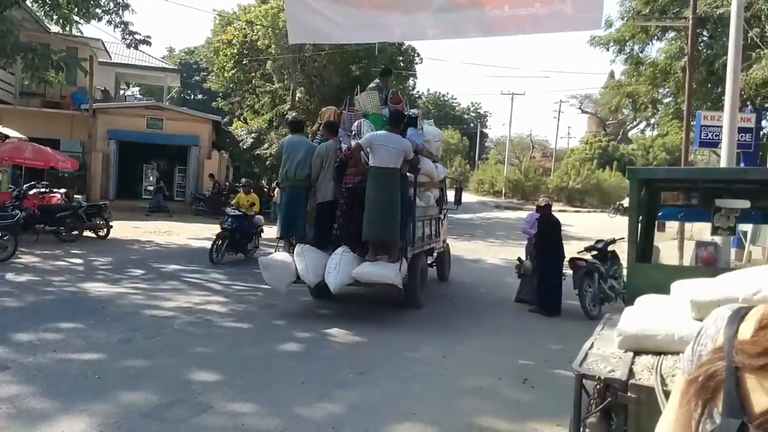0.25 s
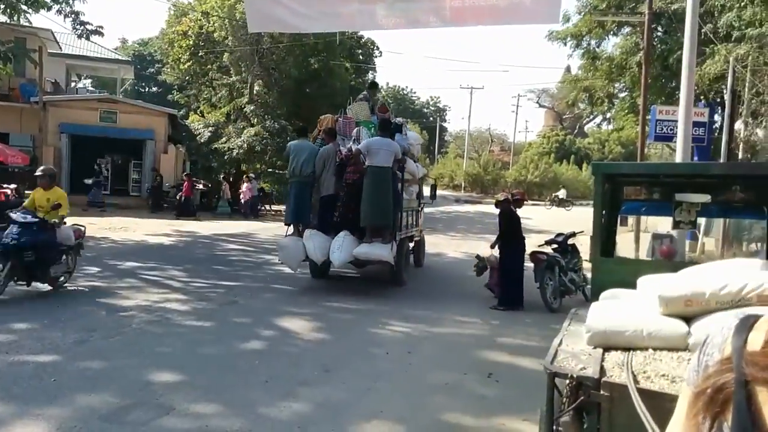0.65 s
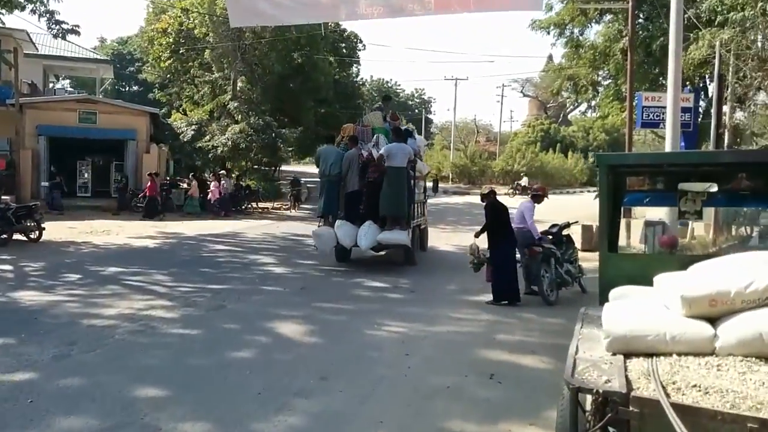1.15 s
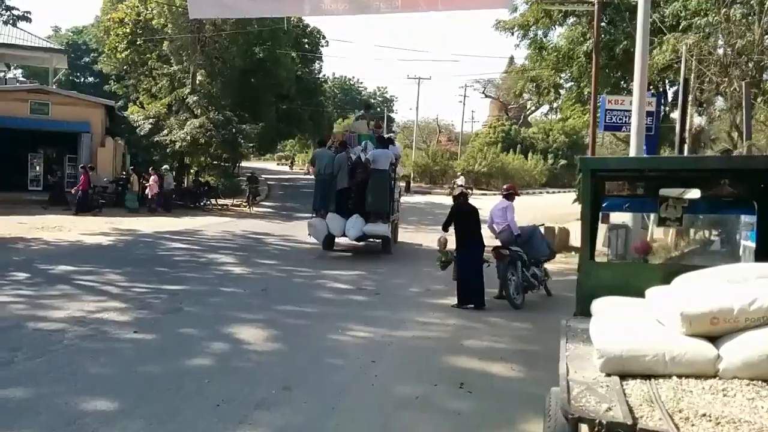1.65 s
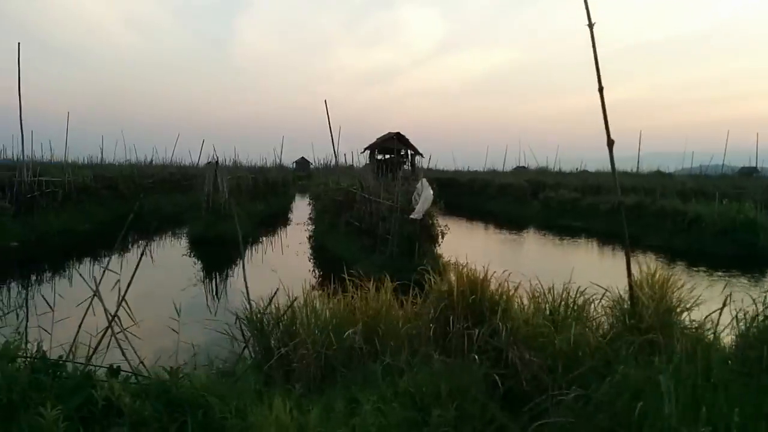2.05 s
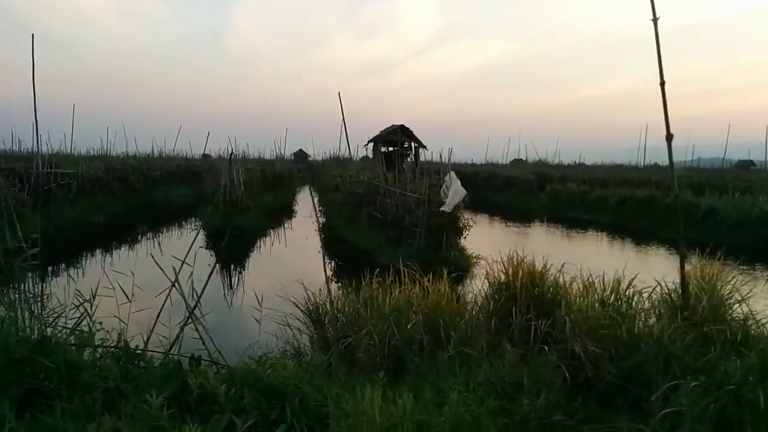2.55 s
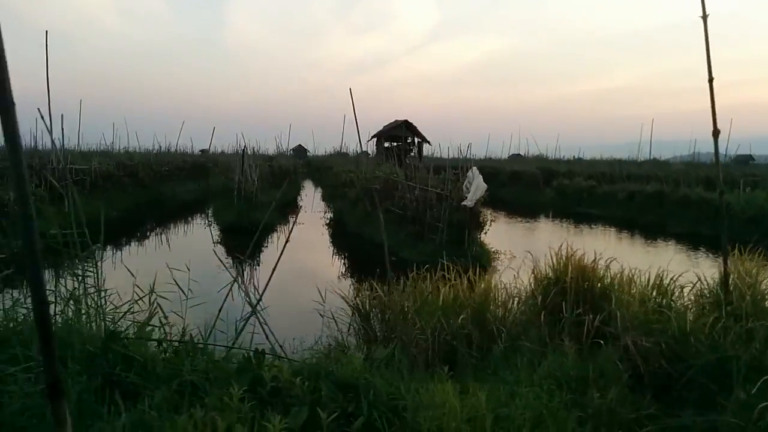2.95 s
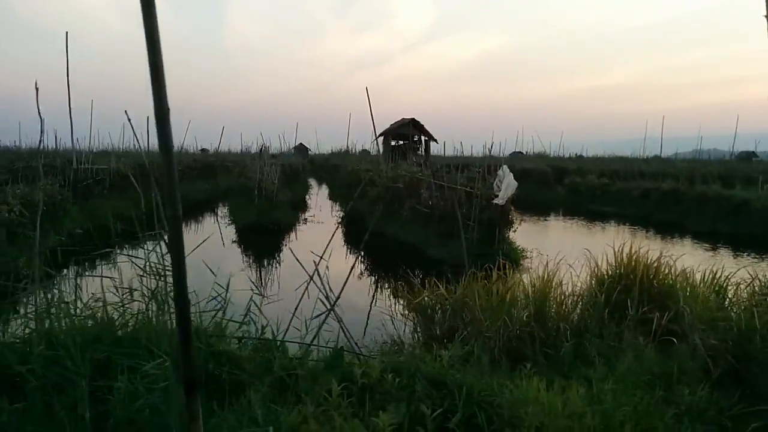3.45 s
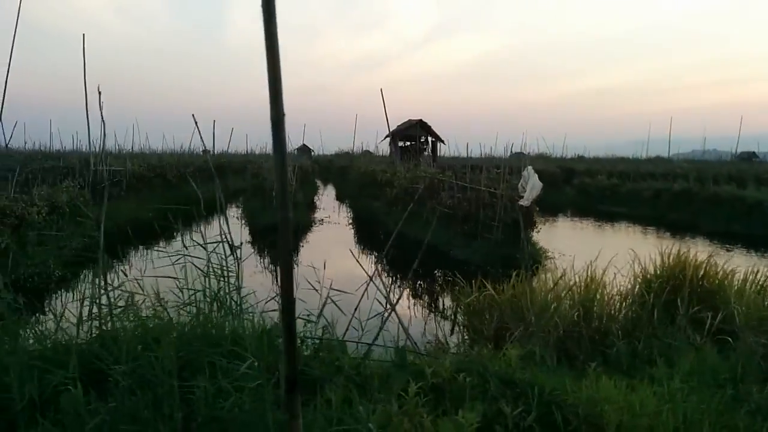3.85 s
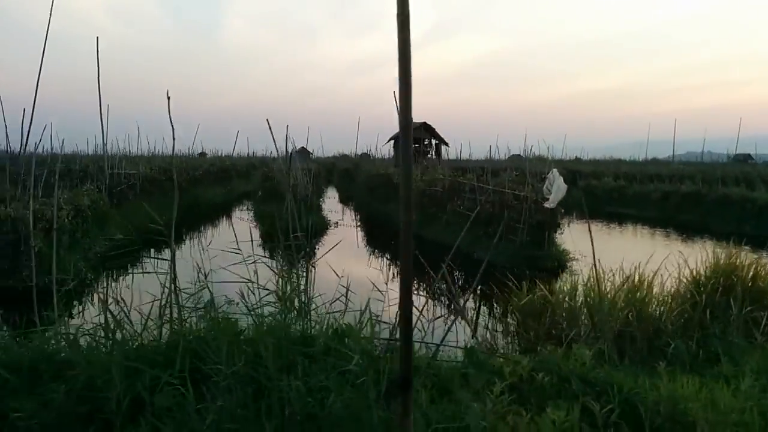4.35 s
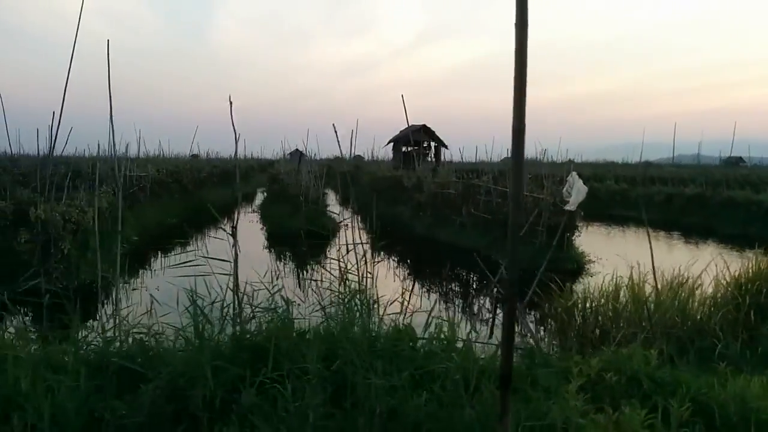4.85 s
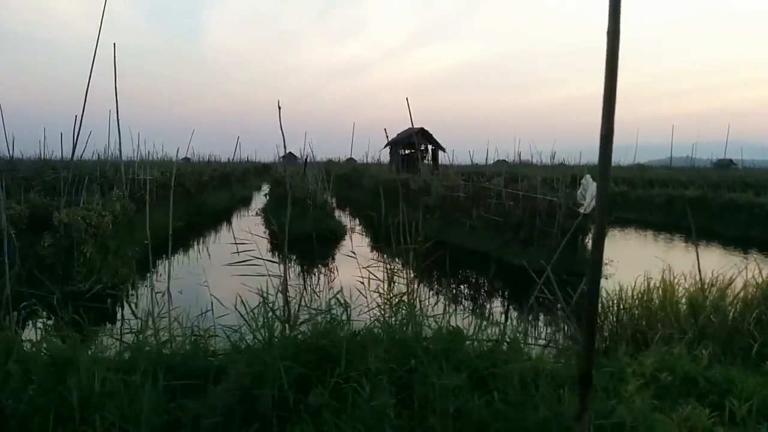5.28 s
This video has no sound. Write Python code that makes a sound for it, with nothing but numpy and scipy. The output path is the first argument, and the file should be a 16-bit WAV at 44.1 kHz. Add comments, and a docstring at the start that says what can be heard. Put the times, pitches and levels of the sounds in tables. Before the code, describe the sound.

A loud single-cylinder diesel farm truck thuds and cracks away close by, then abruptly a quiet boat engine putters over lapping marsh water.

```python
"""A farm truck with a single-cylinder diesel pulls away. Each firing is a low thump, a sharp crack, a bark and
a rasp from the exhaust pipe, over drone, clatter and hiss; a loose steel part clinks early on.
The throttle closes, leaving rumble, a panel that bangs and rubs, and jolts of the load bed.
Abruptly the scene changes to a marsh: a slow boat engine putters (gulp, chuff, squeaks, clack, boom) over
lapping water, joined by a faint cricket and then a far bird. Shaped noise and decaying tones make it all."""
import sys
import numpy as np
from scipy import signal
from scipy.fft import rfft, irfft, next_fast_len
from scipy.io import wavfile
from scipy.ndimage import uniform_filter1d, minimum_filter1d, map_coordinates

SR = 44100
rng = np.random.default_rng(int(sys.argv[2]) if len(sys.argv) > 2 else 0)


def output_pcm(signal):
    """Save a mono or channel-first signal as 16-bit PCM at the path in sys.argv[1].

    Samples are clipped to [-1, 1] before scaling.
    """
    pcm = np.clip(np.atleast_2d(signal).T, -1, 1) * 32767
    wavfile.write(sys.argv[1], SR, np.round(pcm).astype(np.int16))


N = 243431  # length in samples


# beats of the diesel, base levels: crack_s, thump_db, bark_db, rasp_db, crack_db
DIESEL_BEATS = [(0.0542, -23, -17.5, -21, -24), (0.1395, -21, -38, -26.5, -30.5),
                (0.2259, -20.5, -20.5, -29, -24.5), (0.3116, -20.5, -28, -36, -30),
                (0.3974, -19.5, -23.5, -22.5, -20), (0.4836, -22.5, -16.5, -13, -20.5),
                (0.5702, -21, -18, -24, -14), (0.6579, -24, -24, -22.5, -19.5),
                (0.7442, -25, -23, -18, -20), (0.83, -23, -24, -17, -24), (0.918, -21.5, -20.5, -27, -29),
                (1.0058, -24, -18.5, -22.5, -26.5), (1.0936, -23.5, -24, -22, -37),
                (1.1829, -21, -27.5, -36, -55), (1.2687, -22.5, -30.5, -43, -65),
                (1.3519, -30.5, -29, -44, -70), (1.447, -27.5, -40, -37, -81),
                (1.537, -28, -46, -45.5, -81), (1.627, -34, -34.5, -46, -79)]


def truck():
    """Exhaust beats over the noises of the open engine and the shaking body."""
    times, thump_db, bark_db, rasp_db, crack_db = np.transpose(DIESEL_BEATS)
    pipe = exhaust(times, bark_db, rasp_db, crack_db) + steel(times, crack_db)
    beats = thumps(times, thump_db) + pipe + amp(-12.5) * street_echo(pipe)
    return beats + running_noise(times) + panel() + clink() + load_bed()


def thumps(times, thump_db, lead=.0105, first_lead=0.019, settle_s=0.34, rise=0.0049, hold=0.038,
           release=0.0064, pipe_hz=72, overtone_hz=140, overtone_db=-10.0, gain_db=4.0):
    """Each slug of gas swings the air in the silencer; it leads the crack by less as the truck gets going."""
    out, t = np.zeros(N), np.arange(SR // 8) / SR
    for s, db in zip(times, thump_db):
        pitch, colour, length, phase = rng.standard_normal(4)
        fade = 1 + np.exp((t - hold * np.exp(0.052 * length)) / release)
        shape = (1 - np.exp(-t / rise)) / fade
        main = -np.sin(2 * np.pi * pipe_hz * (1 + .06 * pitch) * t)
        overtone = amp(overtone_db + 2.2 * colour) * np.sin(2 * np.pi * overtone_hz * t + phase)
        start = s - lead - first_lead * np.exp(-s / settle_s)
        add(out, start, amp(db + gain_db) * shape * (main + overtone))
    gusts = bursts(times - lead, thump_db - 6.0, rise=0.0013, decay=0.017)
    turbulence = noise([(60, -3.5), (110, 5), (200, -4.5), (450, -6.5)]) * gusts
    return out + turbulence


# low and high resonances of the exhaust pipe: pitch_hz, width_hz, level_db
LOW_PIPE = [(507, 85, -8.5), (631, 59, -1.5), (728, 77, -2.5), (833, 83, -4), (930, 51, -2.5)]
HIGH_PIPE = [(970, 51, 5), (1238, 56, 7), (1460, 86, -5.5), (1827, 65, -1), (2240, 200, -4),
             (2852, 110, -3.5)]
# tone colour of the shock bouncing in the pipe: pitch_hz, level_db
SHOCK_COLOUR = [(500, -10.5), (850, 4.5), (1300, -1), (2200, -4.5), (3000, -30.5), (4000, -19)]
# tone colour of the sharp crack: pitch_hz, level_db
CRACK_COLOUR = [(2500, -29.5), (4000, -11.5), (5100, 9), (6400, -6), (8200, 8), (10500, -5), (13000, -11),
                (16000, -21)]


def exhaust(s, bark_db, rasp_db, crack_db, bounce=0.0036, returned=0.49):
    """Gas leaks as the valve lifts, then a shock leaves the pipe and bounces inside it."""
    leak = bursts(s - .015, bark_db - 5.0, rise=0.00068, decay=0.011)
    blast = bursts(s + 0.0013, bark_db + 3.5, rise=0.00026, decay=0.0035)
    bark = resonate(rng.standard_normal(N) * (leak + blast), LOW_PIPE)
    # every bounce comes later and weaker
    shocks = sum(returned ** k * bursts(s + 0.0026 + k * bounce, rasp_db + 3.0, rise=0.0001, decay=0.0023)
                 for k in range(4))
    rush = bursts(s + 0.0015, rasp_db + 0.5, rise=0.00019, decay=0.0082)
    rasp = resonate(rng.standard_normal(N) * rush, HIGH_PIPE) + shocks * noise(SHOCK_COLOUR)
    snap = bursts(s, crack_db - 0.5, rise=0.0018, decay=0.0023)
    crack = amp(5.1 * wobble(900)) * noise(CRACK_COLOUR, patchy_db=5.5) * snap
    fizz = bursts(s, crack_db - 19.5, rise=0.0018, decay=0.015)
    sizzle = amp(4.5 * wobble(400)) * noise(CRACK_COLOUR, patchy_db=4.5) * fizz
    return bark + rasp + crack + sizzle


# ringing notes of the engine's steel: pitch_hz, level_db, time_to_fall_60_db_s
STEEL_NOTES = [(3940, -14, 0.069), (5444, -1.5, 0.03), (7630, -4, 0.0097), (8140, 1, 0.014),
               (9050, -6.5, 0.0083), (9630, -4.5, 0.016), (11500, -15, 0.012)]


def steel(times, crack_db, count=4, gap=0.0097, loss_db=9.0, scatter_db=5.0, detune=0.014, gain_db=-4):
    """Every crack shakes loose steel: a few uneven contacts, each with its own mix of ringing notes."""
    out, t = np.zeros(N), np.arange(SR // 12) / SR
    hz, level, t60 = np.transpose(STEEL_NOTES)[:, :, None]
    for s, db in zip(times, crack_db):
        for k in range(count):
            size, pitch, phase = rng.standard_normal((3, len(STEEL_NOTES), 1))
            fade = amp(level + scatter_db * size - 60 * t / t60)
            notes = fade * np.sin(2 * np.pi * (hz * (1 + detune * pitch) * t + phase))
            onset = 1 - np.exp(-t / 0.00074)
            add(out, s, amp(db + gain_db - loss_db * k) * notes.sum(0) * onset)
            s = s + gap * (.5 + rng.random())
    return out


def street_echo(x, t60=0.12, gap=0.013):
    """House fronts and the road answer each beat with a short, fading tail."""
    t = np.arange(SR // 3) / SR
    tail = rng.standard_normal(len(t)) * amp(-60 * t / t60) * np.clip(t / gap - 1, 0, 1)
    return signal.fftconvolve(x, tail / np.linalg.norm(tail))[:N]


# base levels of the running truck: time_s, drone_db, clatter_db, hiss_db, loose_bodywork_db
TRUCK_LEVELS = [(0, -36, -28, -36, -30.5), (.32, -40, -34.5, -41, -33), (.7, -30.5, -32, -43.5, -36.5),
                (1.08, -35, -40, -44, -35), (1.2, -34.5, -35.5, -50.5, -36), (1.3, -31, -37, -64.5, -37),
                (1.55, -31, -46, -76, -37), (1.62, -31, -45.5, -65.5, -37), (1.82, -33.5, -39.5, -60, -46)]
# tone colours of the drone, the clatter and the loose bodywork: pitch_hz, level_db
DRONE_COLOUR = [(50, -19.5), (90, -6), (165, 0), (270, -5), (370, -6), (500, -12), (900, -35.5)]
CLATTER_COLOUR = [(250, -37), (450, -3), (620, 5), (950, -4), (1400, -11), (2000, -34), (3500, -39),
                  (6000, -30.5)]
BODYWORK_COLOUR = [(1000, -16.5), (1700, 0.5), (2300, -1.5), (2850, 0.5), (3300, -9), (3900, -9.5),
                   (4600, -34), (6000, -36.5)]
# tone colours of the hiss, near and then far: pitch_hz, level_db
NEAR_HISS = [(2500, -30), (4200, -5), (5800, -2), (7200, 5.5), (8400, 4), (10000, -4.5), (12500, -11.5),
             (15000, -22), (16500, -35.5)]
FAR_HISS = [(2500, -12), (4200, -1.5), (7200, 6), (8400, 1.5), (10000, -13), (16000, -29)]
AWAY_S, DULLING_S = 1.1, .3  # from here the truck draws away, and over this time its hiss dulls


def running_noise(times):
    """Coloured noises of the open engine and body; clatter and rattle dip just before each firing."""
    drone_db, clatter_db, hiss_db, rattle_db = curves(TRUCK_LEVELS)
    drone = amp(drone_db + 2 + wobble(39.58)) * noise(DRONE_COLOUR, patchy_db=4)
    clatter = amp(clatter_db + 1.0 + 3.14 * wobble(70)) * noise(CLATTER_COLOUR, patchy_db=2.5)
    rattle = amp(rattle_db - 3.5 + 1.92 * wobble(90)) * noise(BODYWORK_COLOUR, patchy_db=4.5)
    far = np.clip((clock() - AWAY_S) / DULLING_S, 0, 1) * np.pi / 2
    colour = np.cos(far) * noise(NEAR_HISS, patchy_db=3.5) + np.sin(far) * noise(FAR_HISS, patchy_db=4.5)
    hiss = amp(hiss_db + 1.4 * wobble(170)) * colour
    return lull(times, lead=.029, width=0.012, depth_db=-2) * (clatter + rattle) + drone + hiss


# path of the rubbing body panel: time_s, pitch_hz, level_db
PANEL_RUB = [(1.3, 2210, -57), (1.4, 2122, -42), (1.5, 2416, -39), (1.62, 2302, -41), (1.8, 2210, -56)]
# the bang of the panel: peak_s, level_db, pitch_hz
PANEL_BANG = [(1.36, -24, 2180)]


def panel():
    """A body panel bangs, and rubs with a hoarse ring that rises and sags."""
    hz, db = curves(PANEL_RUB)
    rub = amp(db + 2.3 * wobble(69.7)) * wavering(hz, waver_hz=239, rate=380)
    return rub + knocks(PANEL_BANG, cycles=6.3)


# ringing notes of a loose steel part: pitch_hz, level_db, time_to_fall_60_db_s
CLINK_NOTES = [(4780, -26.5, 0.05), (5020, -22, 0.071), (5300, -18.5, 0.018)]


def clink(s=.226, count=4, gap=0.0098, loss_db=4):
    """A loose steel part is shaken and chatters to rest, each contact weaker than the last."""
    out, t = np.zeros(N), np.arange(SR // 4) / SR
    for k in range(count):
        ring = sum(amp(db - loss_db * k - 60 * t / t60) * np.sin(2 * np.pi * (hz * t + rng.random()))
                   for hz, db, t60 in CLINK_NOTES)
        add(out, s + k * gap, ring * (1 - np.exp(-t / 0.00084)))
    return out


# jolts of the load bed: peak_s, level_db, pitch_hz
LOAD_BED_JOLTS = [(1.542, -18, 217), (1.751, -22.5, 160), (1.818, -19, 174)]


def load_bed():
    """The load bed jolts: low blows that die within a few cycles."""
    return knocks(LOAD_BED_JOLTS, cycles=1.48)


def marsh():
    """The boat engine over a wash of water; both sink just before each main chuff."""
    engine = chuffs() + gurgle() + chatter() + boards()
    quiet = lull(np.transpose(ENGINE_CYCLES)[0], lead=0.028, width=0.011, depth_db=-6)
    return quiet * (engine + wash()) + valve_gear() + hull() + cricket() + bird() + open_air()


# tone colours of a fresh puff and of a spent one: pitch_hz, level_db
FRESH_PUFF = [(150, 8.5), (400, 4), (800, 3.5), (1050, 2), (1500, -5.5), (2200, -10), (3700, -15),
              (4700, -39), (8000, -45.5), (12000, -65)]
SPENT_PUFF = [(60, -16), (150, -10), (330, 3), (520, 1), (800, -3), (1300, -25.5), (2200, -13), (3700, -42),
              (4600, -52), (8000, -47.5), (12000, -72)]


def chuffs(rise=0.015, fall_share=0.16, gain_db=-1, tone_db=-4, first_hz=1000, last_hz=330, sink=.04):
    """A puff starts bright; its noise and its throaty ring sink in pitch as the pressure is spent."""
    bright, dull, ring = np.zeros(N), np.zeros(N), np.zeros(N)
    t = np.arange(SR // 3) / SR
    for s, length, db in puffs():
        fade = 1 + np.exp((t / length - 0.72) / fall_share)
        flow = amp(db + gain_db) * np.minimum(t / rise, 1) / fade
        spent = np.clip(t / 0.075, 0, 1) * np.pi / 2
        stray = 0.195 * unit(uniform_filter1d(rng.standard_normal(len(t)), size=160))
        hz = (last_hz + (first_hz - last_hz) * np.exp(-t / sink)) * np.exp(stray)
        tone = 2 * np.sin(2 * np.pi * np.cumsum(hz) / SR)
        add(bright, s, flow * np.maximum(np.cos(spent), .3))
        add(dull, s, flow * np.sin(spent))
        add(ring, s, flow * np.sin(spent) * amp(tone_db) * tone)
    gas = bright * noise(FRESH_PUFF, patchy_db=6) + dull * noise(SPENT_PUFF, patchy_db=2.0)
    return ring + sputter() * gas


# cycles of the boat engine, base levels: chuff_start_s, chuff_length_s, chuff_db, intake_gulp_db
ENGINE_CYCLES = [(2.033, 0.13, -34.5, -45), (2.302, 0.12, -35.5, -47), (2.55, 0.16, -35.5, -41.5),
                 (2.823, 0.13, -32, -51), (3.096, 0.15, -39, -37), (3.383, 0.14, -39.5, -60),
                 (3.665, 0.15, -38.5, -48.5), (3.947, 0.13, -34.5, -49), (4.216, .13, -32, -62),
                 (4.48, 0.098, -31, -36.5), (4.744, .11, -37, -53.5), (5.01, 0.1, -35.5, -58),
                 (5.279, 0.12, -34, -43)]
GULP_LEAD_S, GULP_LENGTH_S = .1, 0.056  # the engine draws air just before each chuff


def puffs():
    """Every cycle gives a short gulp, then a longer chuff: rows of start_s, length_s, level_db."""
    gulps = [(s - GULP_LEAD_S, GULP_LENGTH_S, gulp_db) for s, _, _, gulp_db in ENGINE_CYCLES]
    return gulps + [(s, length, db) for s, length, db, _ in ENGINE_CYCLES]


def sputter(count=4000, rate=130, scatter_db=4.5, decay=0.0054, steady=0.41):
    """Gas breaks out in uneven, rounded little pops: a gain of average power 1."""
    at = (np.cumsum(rng.uniform(.2, 1.8, count)) / rate * SR).astype(int)
    pops = np.bincount(at, amp(scatter_db * rng.standard_normal(count)), N)[:N]
    fading = signal.lfilter([1], [1, -np.exp(-1 / (decay * SR))], pops)
    rounded = uniform_filter1d(fading, size=56)
    return unit(steady + unit(rounded))


def gurgle(count=7, centre_hz=270, spread=0.3, gain_db=-3):
    """Large bubbles of exhaust break through the water as each chuff ends."""
    s, length, db, _ = np.repeat(ENGINE_CYCLES, count, axis=0).T
    order = np.arange(len(s)) % count
    age = length * (.3 + .6 * (order + rng.random(len(s))) / count)
    hz = centre_hz * np.exp(spread * rng.standard_normal(len(s)))
    return rings(s + age, hz, amp(db + gain_db), cycles=1.8)


def chatter(count=50, low_hz=900, high_hz=3500, gain_db=-16):
    """Loose fittings rattle densely while each puff shakes the boat, dying with its pressure."""
    s, length, db = np.repeat(puffs(), count, axis=0).T
    when, pitch = rng.random((len(s), 2)).T
    hz = low_hz * (high_hz / low_hz) ** pitch
    return rings(s + length * (0.1 + when), hz, amp(db + gain_db - 3.2 * when ** 2), cycles=3.6)


# dry squeaks of the valve gear, about three in a cycle: centre_s, base_level_db
DRY_SQUEAKS = [(2.073, -45.5), (2.35, -42), (2.379, -41.5), (2.413, -41), (2.449, -48), (2.52, -49),
               (2.56, -51), (2.63, -40), (2.665, -45), (2.869, -42.5), (2.9, -46.9), (2.939, -43),
               (3.04, -50), (3.123, -49), (3.169, -41.5), (3.196, -42.5), (3.422, -53), (3.451, -41),
               (3.486, -40), (3.707, -45.5), (3.736, -41), (3.767, -42.5), (3.987, -42), (4.016, -41.4),
               (4.05, -42), (4.233, -57), (4.258, -48), (4.282, -43), (4.32, -44), (4.42, -49.3),
               (4.501, -54), (4.548, -42), (4.582, -43), (4.685, -48.5), (4.807, -40.5), (4.843, -44.5),
               (5.045, -51.5), (5.073, -39), (5.106, -53.7), (5.213, -50.6), (5.321, -45.2), (5.35, -42.5),
               (5.392, -44.5)]
# notes of the squeaking joint: pitch_hz, waver_hz, level_db
SQUEAK_NOTES = [(2710, 170, 2.5), (3180, 240, -4.5)]
# clacks of the valve gear and its loose cover: start_s, level_db
VALVE_CLACKS = [(2.111, -32.5), (2.126, -40), (2.147, -45.5), (2.302, -51.5), (2.372, -39.5), (2.555, -53),
                (2.628, -56), (2.857, -46), (2.938, -40.5), (3.165, -50.5), (3.482, -52.5), (3.727, -44),
                (4.01, -45), (4.277, -38.5), (4.541, -52), (4.803, -48.5), (5.0672, -45.5), (5.345, -50),
                (5.387, -53)]
# tone colour of the clacks: pitch_hz, level_db
CLACK_COLOUR = [(700, -8), (1500, 12.5), (2400, 21), (3500, 11), (5000, 8), (6500, 3), (8500, -8.5),
                (12000, -17), (16000, -22)]


def valve_gear(width=0.0059, squeak_db=-1.0, tick_db=-15, tail_db=-18, tail_decay=0.034):
    """Dry joints tick and squeak at a drifting pitch; the tappet clacks and its cover buzzes on."""
    at, level = np.transpose(DRY_SQUEAKS)
    drift = np.exp(.025 * wobble(25))
    joint = unit(sum(amp(db) * wavering(hz * drift, waver_hz, rate=1400)
                     for hz, waver_hz, db in SQUEAK_NOTES))
    squeak = bells(at, level + squeak_db, width)
    hits, db = np.transpose(VALVE_CLACKS)
    clacks = bursts(hits, db, rise=0.0017, decay=0.0062)
    buzz = bursts(hits, db + tail_db, rise=0.028, decay=tail_decay)
    rattle = amp(1.1 * wobble(500)) * noise(CLACK_COLOUR, patchy_db=4.5)
    return squeak * joint + rattle * (clacks + buzz + amp(tick_db) * squeak)


# booms of the hull at the end of a stroke: peak_s, base_level_db
HULL_BOOMS = [(1.951, -40), (2.146, -30), (2.393, -33.5), (2.927, -34), (3.201, -40.5), (3.478, -34.5),
              (3.763, -33), (4.031, -34.5), (4.298, -34.5), (4.579, -34), (4.885, -32.5), (5.079, -39),
              (5.364, -34)]
BOOM_HZ = 76.6  # the note of the hull
# slaps of water on the hull: peak_s, base_level_db, pitch_hz
WATER_SLAPS = [(2.23, -32, 107), (2.67, -25, 194), (2.905, -25.5, 232), (2.918, -24.5, 270),
               (3.191, -25, 228), (3.285, -35, 255), (4.05, -27.5, 228), (4.296, -35, 269),
               (4.412, -32, 300), (4.543, -23.5, 254), (4.65, -29, 141), (4.862, -25.5, 170),
               (4.879, -21.5, 155), (5.079, -33, 282), (5.093, -25, 244), (5.33, -24, 313),
               (5.39, -27, 260)]


def hull():
    """The hollow hull booms on one low note and answers slaps of water on varied notes."""
    booms = knocks([(s, db + 5, BOOM_HZ) for s, db in HULL_BOOMS], cycles=1.19)
    return booms + amp(0.5) * knocks(WATER_SLAPS, cycles=1.037)


# hard knocks of loose boards in the boat: peak_s, level_db, pitch_hz
BOARD_KNOCKS = [(1.952, -37, 774), (2.86, -38, 700), (3.165, -31, 434), (3.963, -31, 766),
                (3.983, -26.5, 475), (4.262, -30, 513), (4.412, -33.5, 1560), (4.518, -25, 470),
                (5.072, -35, 607)]


def boards():
    """Loose boards knock, each blow ringing for a few cycles."""
    return knocks(BOARD_KNOCKS, cycles=2.17)


# stirred water: time_s, base_level_db
WASH_LEVEL = [(1.86, -50), (2.15, -38), (2.62, -38.5), (2.93, -37.5), (3.4, -39.5), (4.25, -36.5),
              (4.7, -34), (5.1, -36), (5.52, -36.5)]
# tone colour of the water's wash: pitch_hz, level_db
WASH_COLOUR = [(45, -6.5), (80, 2.5), (160, 3.5), (290, 3.5), (370, -8), (720, -10.5), (1220, -26),
               (2400, -28), (3700, -33), (4600, -46)]


def wash():
    """Stirred water is patchy low noise with small plops, rising and falling together."""
    level_db, = curves(WASH_LEVEL)
    water = amp(-1.5) * noise(WASH_COLOUR, patchy_db=7.0) + amp(6.5) * lapping()
    return amp(level_db + 1.74 * wobble(25)) * water


def lapping(count=150, centre_hz=420, spread=0.557, gain_db=-8):
    """Small plops of stirred water at random times and pitches; higher ones are softer."""
    pitch, size = rng.standard_normal((count, 2)).T
    times = rng.uniform(CHANGE_S, N / SR, count)
    hz = centre_hz * np.exp(spread * pitch)
    return rings(times, hz, amp(gain_db + 2 * size) * np.minimum(centre_hz / hz, 1), cycles=2.0)


# path of the cricket's call: time_s, pitch_hz, level_db
CRICKET_CALL = [(2.6, 2190, -89), (3.2, 2176, -58), (3.85, 2135, -55.5), (4.3, 2110, -60.5),
                (5.1, 2130, -75)]


def cricket(wingbeats=64.0, waver_hz=55):
    """One sagging tone, pulsed by each stroke of the wings."""
    hz, db = curves(CRICKET_CALL)
    strokes = np.sin(np.pi * wingbeats * clock()) ** 2 * amp(wobble(51))
    tone = wavering(hz, waver_hz, rate=350)
    return amp(db) * unit(strokes * tone)


# whistles of a water bird: start_s, length_s, from_hz, to_hz, base_level_db
BIRD_WHISTLES = [(3.491, 0.092, 1060, 1370, -40), (4.879, 0.077, 1265, 1440, -49)]


def bird():
    """Faint rising whistles, made hoarse by a straying pitch and an unsteady level."""
    out = np.zeros(N)
    for s, length, from_hz, to_hz, db in BIRD_WHISTLES:
        u = np.linspace(0, 1, round(length * SR))
        hz = from_hz + (to_hz - from_hz) * u + 45 * wobble(300)[:len(u)]
        whistle = np.sin(2 * np.pi * np.cumsum(hz) / SR)
        add(out, s, amp(db - 1.5) * np.sin(np.pi * u) * whistle)
    return out * unit(1 + .5 * wobble(170))


# tone colour of the open marsh's faint hiss: pitch_hz, level_db
AIR_COLOUR = [(2000, -7.5), (4000, -9), (8000, -4), (12000, -13), (16000, -14)]


def open_air():
    """A steady, very faint noise fills the open marsh."""
    return amp(-80.5) * noise(AIR_COLOUR)


def amp(db):
    """Decibels to gain."""
    return 10 ** (np.asarray(db) / 20)


def unit(x):
    """Scale to average power 1 (rms 1)."""
    return x / np.sqrt(np.mean(x ** 2) + 1e-20)


def clock():
    """Time of every sample in seconds."""
    return np.arange(N) / SR


def curves(rows):
    """One value per sample for each column after the time."""
    s, *cols = np.transpose(rows)
    return [np.interp(clock(), s, c) for c in cols]


def wobble(rate):
    """A smooth random curve through this many random points a second."""
    return map_coordinates(rng.standard_normal(int(N * rate / SR) + 4), [clock() * rate])


def filtered(x, response):
    """Change the strength of each frequency in x by a response."""
    m = next_fast_len(N + SR // 2)
    return irfft(rfft(x, m) * response(np.fft.rfftfreq(m, 1 / SR)), m)[:N]


def noise(spectrum, patchy_db=0):
    """Noise of rms 1 with a tone colour; brief patches of pitch are randomly louder or softer."""
    hz, db = np.transpose(spectrum)
    z = signal.stft(rng.standard_normal(N), nperseg=1024)[2]
    field = uniform_filter1d(rng.standard_normal(z.shape), size=3, axis=0)
    field = uniform_filter1d(field, size=2, axis=1)
    patchy = signal.istft(z * amp(patchy_db * unit(field)), nperseg=1024)[1][:N]
    colour = lambda f: amp(np.interp(np.log(f + 1), np.log(hz), db)) * edges(f, hz)
    return unit(filtered(patchy, colour))


def edges(f, hz):
    """Fade out frequencies outside the range of a spectrum."""
    return 1 / np.sqrt(1 + (hz[0] / (f + 1)) ** 6 + (f / hz[-1]) ** 6)


def resonate(x, modes):
    """Ring a set of resonances, fading far outside them; white noise keeps its level."""
    span = [modes[0][0] / 2, modes[-1][0] * 2]

    def peaks(f):
        """Add the resonances with alternating sign."""
        return sum((-1) ** k * amp(db) * 1j * f * w / (c * c - f * f + 1j * f * w)
                   for k, (c, w, db) in enumerate(modes))

    return filtered(x, lambda f: normed(peaks(f) * edges(f, span)))


def normed(response):
    """A response with mean power 1."""
    return response / np.sqrt(np.mean(abs(response) ** 2))


def bursts(times, levels_db, rise, decay):
    """A loudness curve with a smooth rise and exponential fall at each time."""
    out, t = np.zeros(N), np.arange(SR // 4) / SR
    shape = (1 - np.exp(-t / rise)) * np.exp(-t / decay)
    for s, db in zip(times, levels_db):
        add(out, s, amp(db) * shape / shape.max())
    return out


def bells(times, levels_db, width):
    """A loudness curve with a short, rounded swell centred on each time."""
    t = clock()
    return sum(amp(db) * np.exp(-.5 * np.minimum(((t - s) / width) ** 2, 100))
               for s, db in zip(times, levels_db))


def lull(times, lead, width, depth_db):
    """An engine is quietest during compression, just before each firing: a gain."""
    return amp(depth_db * bells(times - lead, np.zeros(len(times)), width))


def wavering(hz, waver_hz, rate):
    """A rough tone of rms 1 that strays around its pitch."""
    return unit(np.sin(2 * np.pi * np.cumsum(hz + waver_hz * wobble(rate)) / SR))


def knocks(rows, cycles):
    """Blows on a hollow body: a few cycles that swell to a peak and die at once."""
    out, t = np.zeros(N), np.arange(SR // 10) / SR
    for s, db, hz in rows:
        peak = cycles / hz
        swell = (t / peak * np.exp(1 - t / peak)) ** 2
        add(out, s - peak, amp(db) * swell * np.sin(2 * np.pi * (hz * t + rng.random())))
    return out


def rings(times, pitches_hz, sizes, cycles):
    """Many short rings, each lasting a few cycles."""
    t = np.arange(SR // 16) / SR
    hz = pitches_hz[:, None]
    u = t * hz / cycles
    waves = sizes[:, None] * u * np.exp(1 - u) * np.sin(2 * np.pi * hz * t)
    places = (times * SR).astype(int)[:, None] + np.arange(len(t))
    return np.bincount(places.ravel(), waves.ravel(), N)[:N]


def add(out, s, sound):
    """Mix a sound in at time s."""
    start = int(np.clip(round(s * SR), 0, N))
    out[start:start + len(sound)] += sound[:N - start]


CHANGE_S = 1.832  # the street has gone by this time


def scene():
    """The street gives way to the marsh within a few milliseconds."""
    street = np.clip((CHANGE_S - clock()) / .003, 0, 1)
    return (street * truck() + (1 - street) * marsh())[None]


TOP_HZ = 16000  # nothing is kept from here up


def record(dry, ceiling=0.45):
    """A limiter holds the loudest beats down, then the highest frequencies are cut."""
    x = dry[0]
    needed = ceiling / np.maximum(abs(x), ceiling)
    gain = uniform_filter1d(minimum_filter1d(needed, size=121), size=121)
    return filtered(gain * x, lambda hz: hz < TOP_HZ)[None]


dry = scene()
out = record(dry)
output_pcm(out)
```